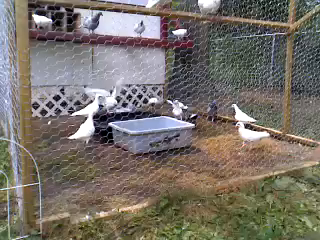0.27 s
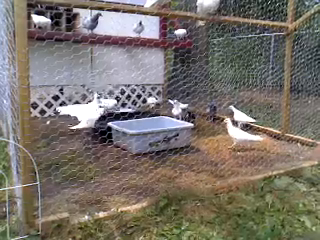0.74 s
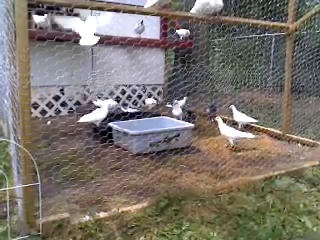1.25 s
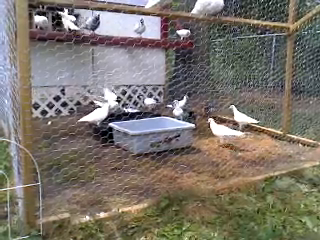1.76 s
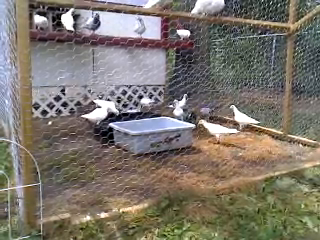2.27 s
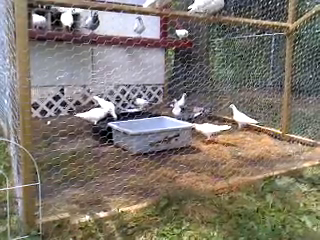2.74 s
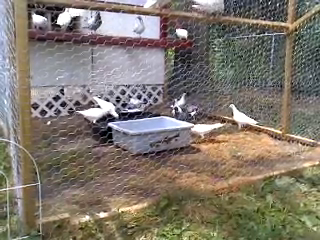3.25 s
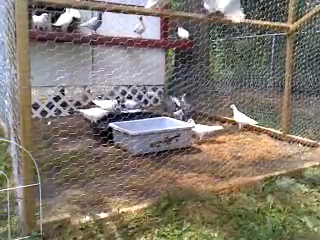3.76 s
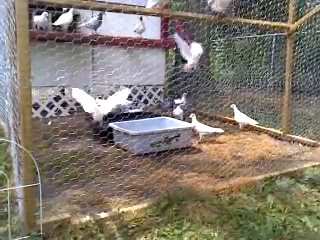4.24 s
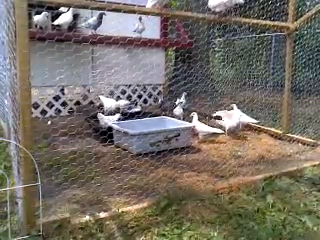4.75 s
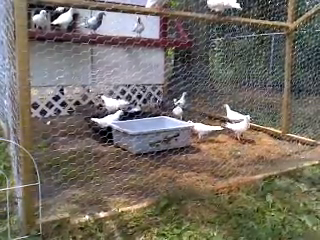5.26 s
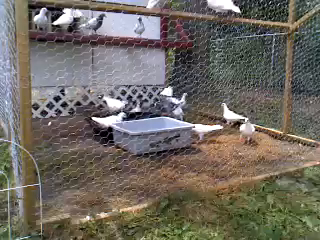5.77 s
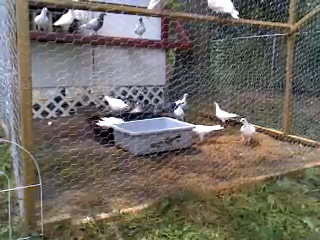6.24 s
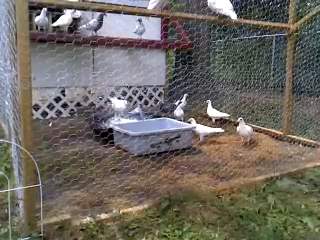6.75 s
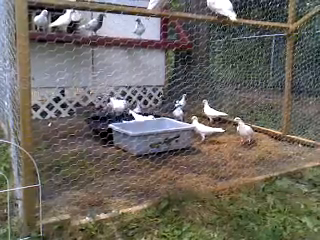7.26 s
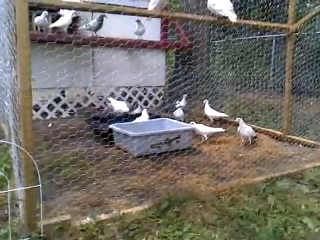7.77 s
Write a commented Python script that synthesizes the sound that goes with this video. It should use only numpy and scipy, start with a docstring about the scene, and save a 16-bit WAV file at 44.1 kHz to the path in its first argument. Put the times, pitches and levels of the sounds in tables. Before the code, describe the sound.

Outdoor bird enclosure heard from a few metres. Quiet water sloshing and patter over distant continuous cooing, with two tiny far-off chirps early on. Brief wing flutters rustle and snap, a cluster of heavier beats follows, then a sharp splash and airy whistling wingbeats. After a short lull, rapid wet slapping, bubbling and flung drops dominate, thinning to isolated splashes. Slight wall echo and short scattered tail; modest, slightly dull microphone.

```python
"""An outdoor aviary: pigeons flap and bathe at a tub a few metres away.
Wingbeats are noise bursts that swish, rustle and push air; wings slapped into the water throw spray and plop.
Wing tips snap in short bursts, feathers whistle, and the coop wall answers with an echo and a scattered tail.
Stirred water is grainy noise with ringing bubbles and ticking drops.
Behind it overlapping coos blend into a steady low drone, and far off a small bird chirps twice."""
import sys
import numpy as np
from scipy import signal
from scipy.fft import rfft, irfft, next_fast_len
from scipy.io import wavfile
from scipy.ndimage import uniform_filter1d, map_coordinates

SR = 44100
rng = np.random.default_rng(int(sys.argv[2]) if len(sys.argv) > 2 else 0)


def put_to_file(sound):
    """Save the sound as 16-bit audio at rate SR, in the file named by the first command-line argument."""
    columns = np.atleast_2d(sound).T  # one column per channel
    safe = np.clip(columns, -1, 1)
    whole_steps = np.round(safe * 32767)
    wavfile.write(sys.argv[1], SR, whole_steps.astype(np.int16))


N = 353241  # length in samples
TOP_HZ = 9150  # nothing sounds above this


def amp(db):
    """Decibels to gain."""
    return 10 ** (np.asarray(db) / 20)


def unit(x):
    """Scale to rms 1."""
    return x / np.sqrt(np.mean(x ** 2) + 1e-20)


def curves(rows):
    """One value per sample for each column after the time."""
    seconds, *columns = np.transpose(rows)
    return [np.interp(np.arange(N) / SR, seconds, column) for column in columns]


def wobble(rate):
    """A smooth random curve with rate knots a second."""
    knots = rng.standard_normal(int(N * rate / SR) + 4)
    return map_coordinates(knots, [np.arange(N) * rate / SR])


def filtered(x, response):
    """Multiply the spectrum of x by a response of frequency."""
    size = next_fast_len(N + SR // 2)
    hz = np.fft.rfftfreq(size, 1 / SR)
    return irfft(rfft(x, size) * response(hz), size)[:N]


def coloured(x, points):
    """Shape x with a spectrum of (Hz, dB) points on a log frequency axis."""
    point_hz, db = np.transpose(points)
    return filtered(x, lambda hz: amp(np.interp(np.log(hz + 1), np.log(point_hz), db)))


def shaped(source, envelope, points):
    """A steady source under an envelope, then coloured; the envelope gives its rms."""
    return coloured(source * envelope, points) / np.std(coloured(source, points))


def band(x, low_hz, high_hz):
    """A gentle, causal band-pass, scaled to unit energy."""
    b, a = signal.butter(1, [low_hz, min(high_hz, .45 * SR)], "bandpass", fs=SR)
    y = signal.lfilter(b, a, x)
    return y / np.linalg.norm(y)


def noise():
    """White noise."""
    return rng.standard_normal(N)


def grains(rate, spread_db, smooth):
    """Tiny ticks of scattered size, rate a second at random moments, over a share of smooth noise."""
    hits = rng.random(N) < rate / SR
    sizes = amp(spread_db * np.clip(noise(), -2, 2))
    return unit(hits * np.sign(noise()) * sizes) + smooth * noise()


def swell(s, half, lopsided=0.6):
    """A narrow early bump, a dip, then a sudden jump at s and a slower fall: (start s, shape)."""
    first = max(int((s - 4 * half) * SR), 0)
    t = np.arange(first, int((s + 5 * half) * SR)) / SR
    width = half * (1 + lopsided * np.sign(t - s))
    return t[0], np.exp(-.5 * ((t - s + lopsided * half) / width) ** 2)


def add(track, s, sound):
    """Mix a sound into the track at s seconds."""
    part = track[max(round(s * SR), 0):][:len(sound)]
    part += sound[:len(part)]


# The pitches the low hum swells around. Each row: centre in Hz, width in Hz, level in dB rms.
HUM_BANDS = [(89.5, 24, -70.5), (120.7, 9.8, -66.5), (157.2, 21, -67.5), (179.4, 17, -66),
             (283.7, 5.5, -69.5), (347.6, 34, -69)]


def drone():
    """A distant low hum: noise through narrow resonances, so that each band wavers."""
    hum = np.zeros(N)
    for hz, width, db in HUM_BANDS:
        resonance = filtered(noise(), lambda f: 1 / (1 + (2 * (f - hz) / width) ** 4))
        hum += amp(db) * unit(resonance)
    return hum


# Colour of the blended flock. Each row: frequency in Hz, relative level in dB.
CHORUS_COLOUR = [(30, -58), (50, -35.5), (70, -21.5), (87, -11.5), (100, -6), (120, -1.5), (160, -0.5),
                 (215, -5), (285, -3), (325, -7), (360, -3.5), (420, -16), (520, -31.5), (900, -69.5)]


def cooing(count=160, low_hz=150, high_hz=350, length=0.3666, arch=0.1232, flutter=.06, throb=.6,
           coo_db=-5, flock_db=-56):
    """Many overlapping, throbbing tones arch in pitch; noise of the same colour blurs them with distance."""
    coos = np.zeros(N)
    quiver = wobble(90)
    for turn, (when, voice, stretch, trill) in enumerate(rng.random((count, 4))):
        t = np.arange(int(length * (.5 + stretch) * SR)) / SR
        arc = np.sin(np.pi * t / t[-1])
        # every coo takes its own stretch of the quiver
        bend = arch * (arc - .5) + flutter * np.roll(quiver, int(trill * N))[:len(t)]
        hz = low_hz * (high_hz / low_hz) ** voice * (1 + bend)
        pulsing = 1 + throb * np.sin(2 * np.pi * (20 + 18 * trill) * t)
        tone = np.sin(2 * np.pi * np.cumsum(hz) / SR)
        add(coos, (turn + when) / count * N / SR, arc * pulsing * tone)
    blur = unit(coloured(noise(), CHORUS_COLOUR))
    chorus = amp(coo_db) * unit(coloured(coos, CHORUS_COLOUR)) + blur
    return amp(flock_db) * unit(chorus)


# A small bird far away. Each row: moment in seconds, pitch in Hz, level in dB, half length in seconds.
BIRD_CHIRPS = [(0.54, 4500, -70, .035), (1.973, 4470, -70, .035)]


def far_bird(width_hz=700):
    """Distance smears each chirp into a soft, narrow hiss."""
    out = np.zeros(N)
    for s, hz, db, half in BIRD_CHIRPS:
        start, pulse = swell(s, half)
        low_hz, high_hz = hz - width_hz / 2, hz + width_hz / 2
        smear = band(band(rng.standard_normal(len(pulse)), low_hz, high_hz), low_hz, high_hz)
        add(out, start, amp(db) * pulse * unit(smear))
    return out


# Stirring in the tub. Each row: moment in seconds, base sloshing level in dB, base patter level in dB.
TUB_STIR = [(0.0, -62.5, -63), (0.31, -64.5, -66), (0.94, -64.5, -64.5), (1.11, -60, -59), (1.61, -64, -66),
            (2.54, -62, -64.5), (2.92, -59, -58.5), (3.26, -58.5, -55.5), (3.43, -58, -60.5),
            (3.9, -61, -60), (4.48, -59.5, -61.5), (4.75, -61, -65), (5.06, -60.5, -64.5),
            (5.42, -57.5, -60.5), (6.4, -56, -53.5), (6.85, -55, -50), (7.16, -58.5, -60.5),
            (8.01, -56, -58)]
# Colour of sloshing water. Each row: frequency in Hz, relative level in dB.
SLOSH_COLOUR = [(150, -29), (400, -1.5), (600, -4), (950, -2.5), (1400, -6), (2200, -10.5), (3500, -16),
                (7000, -22.5)]
# Colour of drops, feet, feathers and spray. Each row: frequency in Hz, relative level in dB.
PATTER_COLOUR = [(900, -20.5), (2000, -15), (3200, -2), (5000, -0.5), (6800, 4), (9000, -7.5)]


def stirring():
    """Water sloshes, drops and feet patter over the hiss of the yard: grainy noise that follows the stir."""
    slosh, patter = curves(TUB_STIR)
    bustle = wobble(45)
    # quiet moments are smooth hiss; busy ones break up into single drops
    busy = (patter - patter.min()) / np.ptp(patter)
    slosh_level = amp(slosh + 1.9 * busy * bustle)
    water = shaped(grains(rate=900, spread_db=-0.5, smooth=1.17), slosh_level, SLOSH_COLOUR)
    drops = unit(noise() + 0.53 * np.sqrt(busy) * grains(rate=700, spread_db=8.5, smooth=0))
    return water + shaped(drops, amp(patter + 2.8 * busy * bustle), PATTER_COLOUR)


def extra_stir():
    """How far the patter gain rises above its calmest moment."""
    stir = amp(curves(TUB_STIR)[1])
    return stir - stir.min()


def busy_moments(count):
    """Random moments, more of them the harder the water is stirred: (s, patter dB there)."""
    patter = curves(TUB_STIR)[1]
    chance = np.cumsum(amp(patter))
    targets = chance[-1] * (np.arange(count) + rng.random(count)) / count
    at = np.searchsorted(chance, targets)
    return zip(at / SR, patter[at])


def bubbles(count=1300, middle_hz=2400, spread=.5, cycles=7, rise=0.13, size_db=7.5, level_db=-6):
    """Drops fall back into the tub and leave small bubbles whose pitch rises as they fade."""
    out = np.zeros(N)
    t = np.arange(SR // 30) / SR
    pitches, sizes = np.clip(rng.standard_normal((count, 2)).T, -2, 2)
    for when, pitch, size in zip(rng.random(count), pitches, sizes):
        hz = middle_hz * np.exp(spread * pitch)
        age = hz * t / cycles
        tone = np.sin(2 * np.pi * hz * t * (1 + rise * np.tanh(age / 2) / 2))
        ring = (1 - np.exp(-6 * age)) * np.exp(-age) * tone
        add(out, when * N / SR, amp(size_db * size) * np.sqrt(hz) * ring)
    # only water that is being stirred makes them
    return amp(level_db) * extra_stir() * unit(out)


# Colour of the drop ticks. Each row: frequency in Hz, relative level in dB.
TICK_COLOUR = [(500, -20), (1200, -3), (2500, -3), (4500, 0), (7000, 0.5), (9000, -11.5)]


def droplets(level_db=-7):
    """Flung drops tick sharply on the water and the tub while it is stirred."""
    ticks = grains(rate=230, spread_db=3, smooth=0)
    return shaped(ticks, amp(level_db) * extra_stir(), TICK_COLOUR)


SPLASH_HALF_S = 0.009  # half length of a splash
# Wings slapped into the water. Each row: moment in seconds, spray level in dB,
# depth from 0 (skims the surface) to 1 (plunges).
WATER_SLAPS = [(3.651, -43, .2), (3.771, -46, .05), (3.811, -47, .4), (3.857, -47, 0.12), (5.16, -61, 1),
               (5.275, -54, 0.96), (5.307, -46.5, .05), (5.407, -51, 1), (5.438, -54.5, 0), (5.528, -48, 1),
               (5.56, -45.5, .1), (5.65, -51, 0.98), (5.681, -52, 0), (5.783, -41.5, 0.66),
               (5.842, -47, 0.55), (5.872, -37.5, .75), (6.012, -54.5, .1), (6.045, -53, 0.49),
               (6.123, -47, 0.5), (6.15, -42.5, 0.97), (6.216, -46, 1), (6.247, -44, 0.82),
               (6.277, -45, 0.91), (6.322, -44.5, 0.84), (6.362, -42.5, .5), (6.437, -49, .85),
               (6.545, -51.5, 0.67), (6.616, -43.5, 0.29), (6.67, -47.5, 0.98), (6.712, -47.5, 0.93),
               (6.851, -46, .25), (6.945, -50, 0.87), (6.974, -47, .3), (7.121, -50, .2), (7.408, -56, .2),
               (7.523, -52, 0.5), (7.641, -52, 0.4), (7.756, -47, .65), (7.865, -47.5, 0.57)]


def plops(hz=440, spread=.1, ring_s=0.011, rise=.12, plunge_db=30):
    """A plunging wing traps a pocket of air that rings low, briefly, and rises in pitch."""
    out = np.zeros(N)
    t = np.arange(SR // 12) / SR
    age = t / ring_s
    for (s, db, depth), chance in zip(WATER_SLAPS, rng.uniform(-1, 1, len(WATER_SLAPS))):
        pitch = hz * (1 + spread * chance) * (1 + rise * np.tanh(age / 2))
        tone = np.sin(2 * np.pi * np.cumsum(pitch) / SR)
        ring = (1 - np.exp(-4 * age)) * np.exp(-age) * tone
        # shallow slaps hardly plop
        add(out, s - SPLASH_HALF_S, 2 * amp(db - plunge_db * (1 - depth)) * ring)
    return out


# Air sings in the flight feathers. Each row: moment in seconds, pitch in Hz, base level in dB,
# glide in octaves per second.
FEATHER_WHISTLES = [(.954, 1500, -56, 12), (1.085, 1700, -61, 10), (1.195, 1650, -56.5, 6.5),
                    (1.244, 940, -48, -5.5), (3.922, 1020, -56, -1.5), (4.066, 950, -51.5, .5),
                    (4.07, 2100, -58, -1), (4.383, 1400, -60.5, 2), (4.463, 2750, -62.5, 0),
                    (4.513, 1400, -57, 3.5), (4.558, 1204, -52, -.5), (7.023, 2046, -55, -3.5)]


def wing_whistles(half_s=0.01, waver=0.057, breathy=0.71, level_db=-2):
    """Short, unsteady, airy tones from the flight feathers: gliding sines with random pitch and level."""
    out = np.zeros(N)
    drift = wobble(600)
    for s, hz, db, glide in FEATHER_WHISTLES:
        start, pulse = swell(s, half_s)
        t = start - s + np.arange(len(pulse)) / SR
        pitch = hz * 2 ** (glide * t) * (1 + waver * drift[round(start * SR):][:len(pulse)])
        tone = np.sin(2 * np.pi * np.cumsum(pitch) / SR)
        add(out, start, np.sqrt(2) * amp(db + level_db) * pulse * tone)
    return out * (1 + breathy * wobble(700))


# The sharpest snaps of wing tips and water. Each row: start in seconds, crack level in dB before
# longer snaps gain weight, length in seconds, brightness from 0 to 1.
SHARP_SNAPS = [(.0187, -42.5, 0.0073, 0.91), (.121, -50, 0.0042, 0.87), (.2595, -53, 0.003, 0.64),
               (.3255, -49, 0.0027, 1), (.687, -52, 0.0027, 0.72), (.8915, -49, .0015, 0.8),
               (1.039, -47, 0.0086, 0.64), (1.1462, -42.5, .01, 0.72), (1.2575, -46, 0.0026, .65),
               (1.4337, -51, 0.0063, 0.37), (1.447, -49.5, 0.0039, 0.3), (1.7086, -51.5, .0018, 0.86),
               (2.315, -50.5, 0.0017, 0.84), (2.672, -39.5, 0.0012, 0.6), (2.705, -42.5, 0.0018, 0.8),
               (2.801, -50.5, 0.0027, 0.54), (2.979, -46, 0.0019, 0.9), (3.0165, -49, 0.0066, 0.86),
               (3.0465, -43.5, 0.0044, .45), (3.138, -46.5, 0.0043, 0.32), (3.215, -47, .007, 0.47),
               (3.256, -38.5, 0.0053, 0.67), (3.322, -41.5, 0.0023, 0.58), (3.378, -42, 0.0036, 0.56),
               (3.6382, -28, 0.0038, 0.75), (3.804, -34, 0.0016, 0.55), (5.1264, -48.8, .0042, 1),
               (5.1638, -44.5, .0014, 1), (5.3015, -34.5, 0.0025, 1), (5.3748, -41, 0.0027, 0.81),
               (5.55, -42, 0.0021, 0.64), (5.784, -31.5, 0.0024, 1), (5.88, -34, 0.0011, 0.7),
               (5.91, -26.5, 0.0011, 1), (6.0107, -42, 0.0034, 0.7), (6.204, -46.5, .003, 0.25),
               (6.2588, -39, 0.00078, 1), (6.367, -42, 0.0059, .75), (6.539, -42.5, .0046, 0.63),
               (6.618, -38.5, 0.0048, 0.83), (6.7036, -45, 0.0041, .65), (6.841, -36.5, 0.0029, 0.83),
               (7.1303, -26, 0.00058, 0.86), (7.3895, -38.5, 0.0026, 0.97), (7.407, -37.5, 0.0041, 0.82),
               (7.5243, -41.5, 0.0013, 0.8), (7.6706, -39, .0011, 0.8)]


def snaps(tick_db=6, tick_spread_db=2, tick_length=0.0044, tick_brightness=0.82, count=50):
    """The sharp snaps, and small ticks wherever the birds are busy: (s, dB, length s, brightness)."""
    ticks = []
    for (s, db), size in zip(busy_moments(count), rng.uniform(-0.91, 1, count)):
        ticks.append((s, db + tick_db + tick_spread_db * size, tick_length, tick_brightness))
    return SHARP_SNAPS + ticks


def wing_snaps(body_db=-1.0, dull_hz=3700, bright_hz=6800, width=1.27, body_low_hz=420, body_high_hz=2800,
               slap_db=3, slap_bright_db=-25.5, pocket_db=-8, pocket_hz=780, pocket_width=1.32,
               attack=.0001, release=0.0014):
    """Stiff feathers strike one after another within a few milliseconds; light contacts ring brighter."""
    crack, body = np.zeros((2, N))
    t = np.arange(SR // 30) / SR
    quills = filtered(grains(rate=7000, spread_db=3, smooth=0.63), lambda hz: hz < TOP_HZ)
    for s, high, length, brightness in snaps():
        burst = (1 - np.exp(-t / attack)) * np.exp(-np.maximum(t - 0.96 * length, 0) / release)
        tips = burst * quills.take(round(s * SR) + np.arange(len(t)), mode="wrap")
        hz = dull_hz * (bright_hz / dull_hz) ** brightness
        size = np.sqrt(max(length, .001) * SR)
        add(crack, s, size * amp(high) * band(tips, hz / width, hz * width))
        # the broad vane behind the tips gives a duller slap, weaker as the snap brightens
        low = high + slap_db + slap_bright_db * brightness ** 2
        vane = band(burst * rng.standard_normal(len(t)), body_low_hz, body_high_hz)
        add(body, s, size * amp(low + body_db) * band(vane, body_low_hz, body_high_hz))
        # the air pocket that the wing closes on pops hollowly
        pop = band(vane, pocket_hz / pocket_width, pocket_hz * pocket_width)
        add(body, s, size * amp(low + pocket_db) * pop)
    return crack + body


# Wingbeats in the air. Each row: moment in seconds, swish level in dB,
# depth from 0 (a flick of the tips) to 1 (the whole wing).
AIR_BEATS = [(.085, -58, 1), (.634, -58.5, 0.65), (0.951, -55, 0.13), (1.146, -56.5, 0.39),
             (1.264, -50, 0.095), (1.574, -54.5, 0.054), (2.707, -50.5, 0.18), (2.84, -53.5, 0.32),
             (2.944, -48, 0.67), (3.022, -43, 0.79), (3.051, -47, .8), (3.151, -47, .4), (3.228, -53.5, .3),
             (3.272, -44, 0.86), (3.345, -53, 0.33), (3.381, -47.5, .45), (3.43, -52, 0.12),
             (3.928, -54, 0.97), (4.075, -51, 1), (4.267, -50.5, .95), (4.535, -54, .1),
             (4.563, -49.5, 0.48)]


def wingbeats(usual_half_s=0.0099, rustle_db=3.5, rustle_depth_db=-12, push_db=-14.5, push_depth_db=17,
              twice_as_fast_db=20.5):
    """Deep beats push more and rustle less, strong ones are quicker: (s, swish, rustle, push dB, half s)."""
    usual_db = np.mean(AIR_BEATS, axis=0)[1]
    beats = []
    for s, db, depth in AIR_BEATS:
        rustle = db + rustle_db + rustle_depth_db * depth
        push = db + push_db + push_depth_db * depth
        # a beat twice_as_fast_db stronger takes half the time
        half = usual_half_s * 2 ** ((usual_db - db) / twice_as_fast_db)
        beats.append((s, db, rustle, push, half))
    return beats


def water_strokes(swish_db=-4.5, thump_db=-19.5, plunge_db=20.5, ruffle_db=-2, ruffle_depth=0.55, count=40):
    """Splashes, and light ruffles at random moments, more often where the water is stirred harder.

    Deeper ones thump more: (s, swish dB, spray dB, push dB, half length s)."""
    ruffles = [(s, db + ruffle_db, ruffle_depth) for s, db in busy_moments(count)]
    return [(s, db + swish_db, db, db + thump_db + plunge_db * depth, SPLASH_HALF_S)
            for s, db, depth in WATER_SLAPS + ruffles]


# Colour of the air swish. Each row: frequency in Hz, relative level in dB.
SWISH_COLOUR = [(200, -13.5), (450, 0.5), (700, 1.5), (900, 2), (1300, -5.5), (2100, -6), (3200, -15.5),
                (7000, -16.5)]
# Colour of the shoved air. Each row: frequency in Hz, relative level in dB.
PUSH_COLOUR = [(30, -41), (70, -21.5), (130, -5.5), (220, -1), (400, -7.5), (600, -13.5), (1200, -37)]


def wing_strokes():
    """Every stroke swishes, rustles with feathers and spray, and shoves a little air."""
    air, feathers, push = np.zeros((3, N))
    for s, swish, rustle, shove, half in wingbeats() + water_strokes():
        start, pulse = swell(s, half)
        add(air, start, amp(swish) * pulse)
        add(feathers, start, amp(rustle) * pulse)
        add(push, start, amp(shove) * pulse)
    spray = grains(rate=1300, spread_db=4.0, smooth=0.35)
    rustling = shaped(spray, feathers, PATTER_COLOUR)
    return shaped(noise(), air, SWISH_COLOUR) + rustling + shaped(noise(), push, PUSH_COLOUR)


def patchy(x, depth_db):
    """Every moment gets its own colour, as wings and water change shape."""
    spectrum = signal.stft(x, nperseg=512)[2]
    field = rng.standard_normal(spectrum.shape)
    for axis in (0, 1):
        field = uniform_filter1d(field, 5, axis)
    gain = amp(depth_db * np.clip(unit(field), -2, 2))
    return signal.istft(spectrum * unit(gain), nperseg=512)[1][:N]


def aviary(x, wall_delay=0.0098, wall_db=-21, scatter_db=-12, t60=0.16, count=40):
    """The coop wall returns one echo; ground, tub and fence scatter a short diffuse tail.

    The tail is drawn anew for each of count equal pieces."""
    t = np.arange(SR // 4) / SR
    scatter = np.zeros(N)
    start = 0
    for piece in np.array_split(x, count):
        tail = rng.standard_normal(len(t)) * amp(-60 * t / t60) * (1 - np.exp(-t / 0.0014))
        add(scatter, start / SR, signal.fftconvolve(piece, tail / np.linalg.norm(tail)))
        start += len(piece)
    echo = filtered(x, lambda hz: np.exp(-2j * np.pi * hz * wall_delay))
    return x + amp(wall_db) * echo + amp(scatter_db) * scatter


def scene():
    """Life behind, stirred water with fizz and drips, and wings near the tub."""
    background = drone() + cooing() + far_bird()
    drips = bubbles(count=450, middle_hz=3237, spread=.33, cycles=12, rise=0.091, size_db=1.5, level_db=-13)
    water = stirring() + bubbles() + drips + droplets() + plops()
    wings = aviary(patchy(wing_strokes(), depth_db=1.4) + wing_snaps() + wing_whistles())
    return (background + water + wings)[None]


# Response of the microphone. Each row: frequency in Hz, gain in dB.
MICROPHONE_RESPONSE = [(25, -14.5), (55, 0), (6800, 1), (7200, -5.5), (7600, -16.5), (8000, -25),
                       (8600, -25.5), (9000, -32)]


def record(dry):
    """A small microphone whose treble falls away steeply."""
    return filtered(coloured(dry[0], MICROPHONE_RESPONSE), lambda hz: hz < TOP_HZ)[None]


dry = scene()
out = record(dry)
put_to_file(out)
```